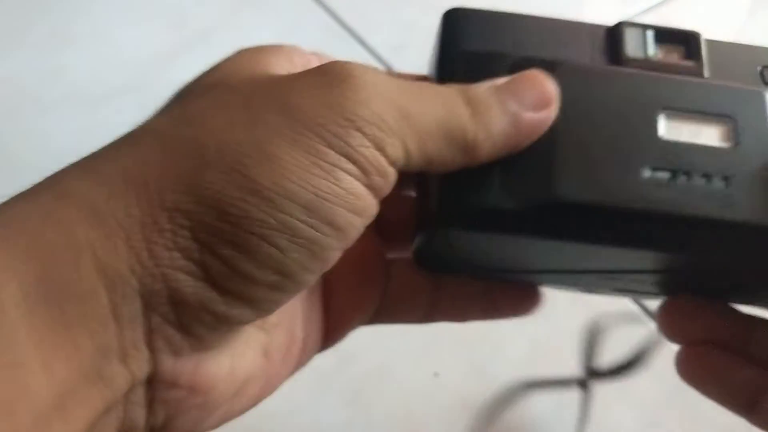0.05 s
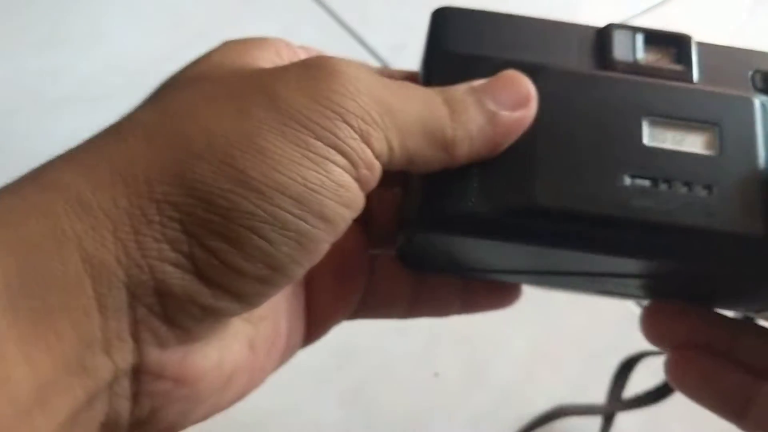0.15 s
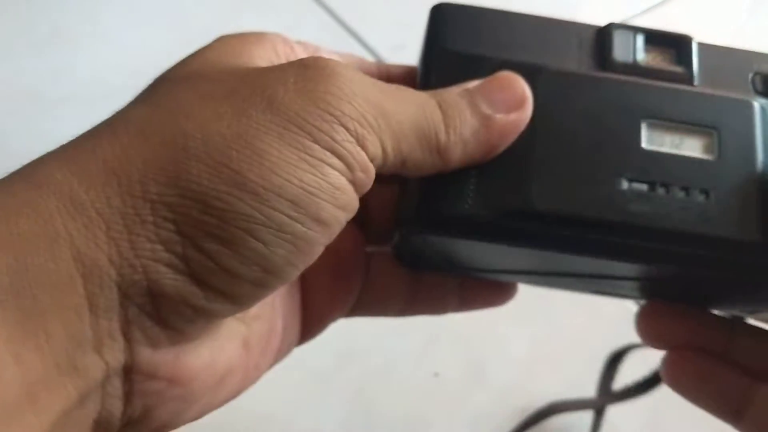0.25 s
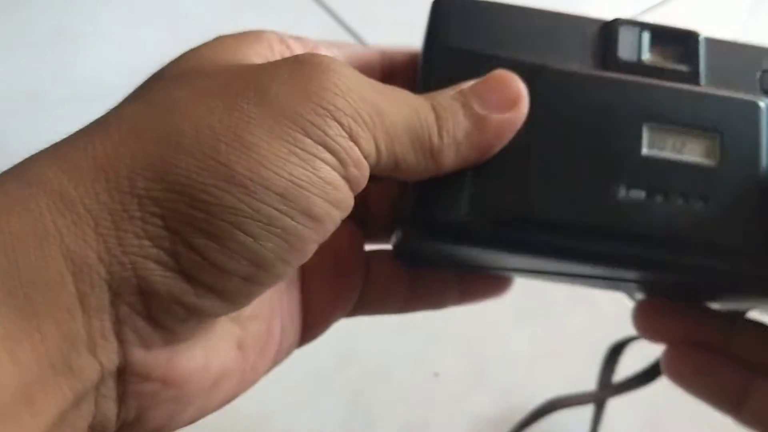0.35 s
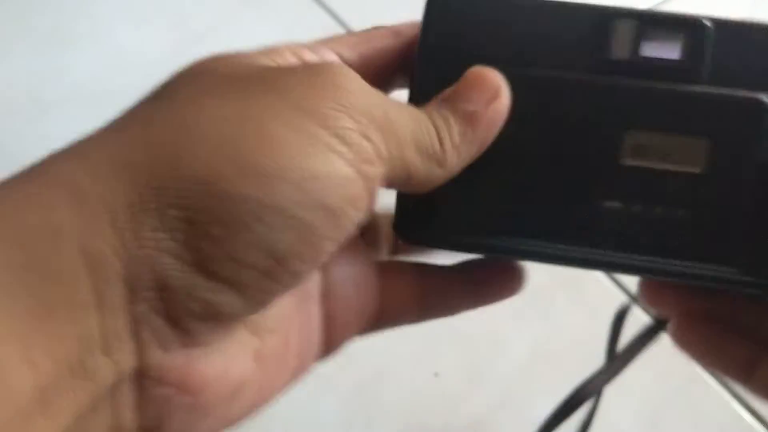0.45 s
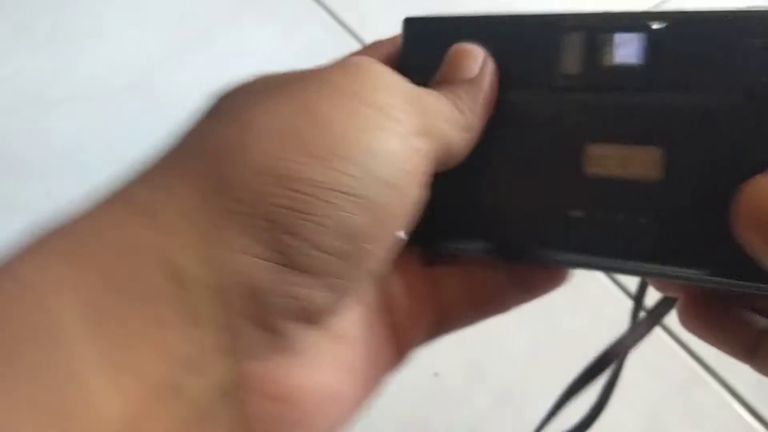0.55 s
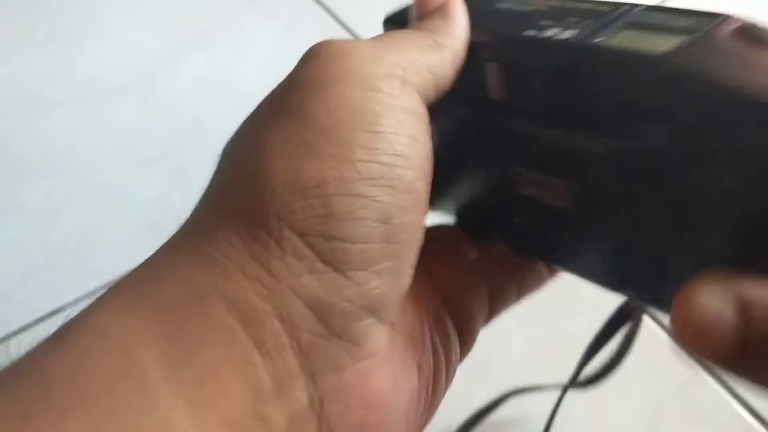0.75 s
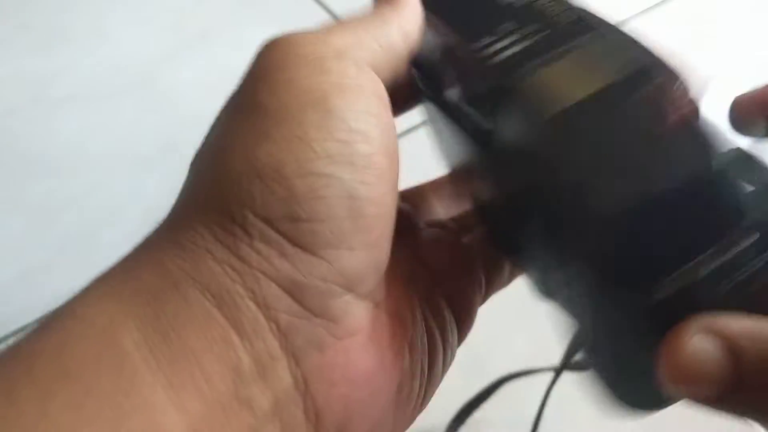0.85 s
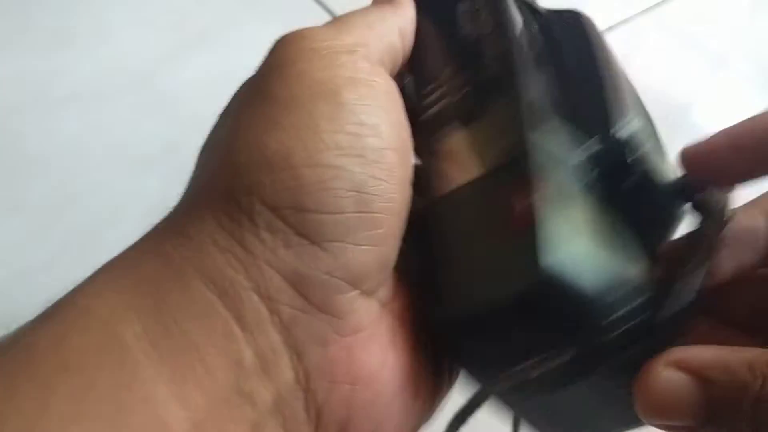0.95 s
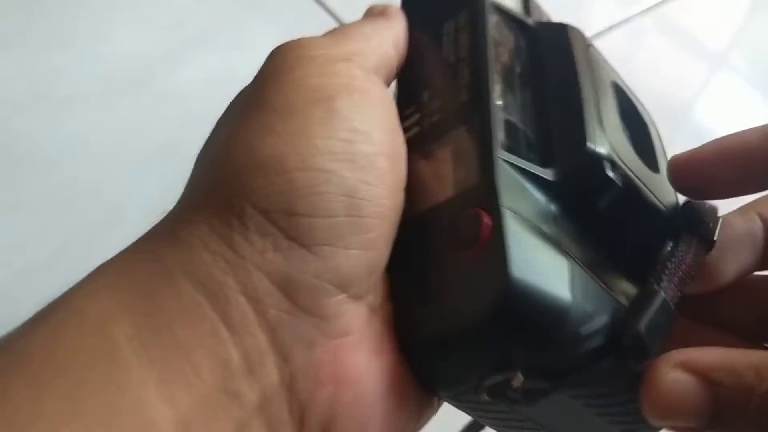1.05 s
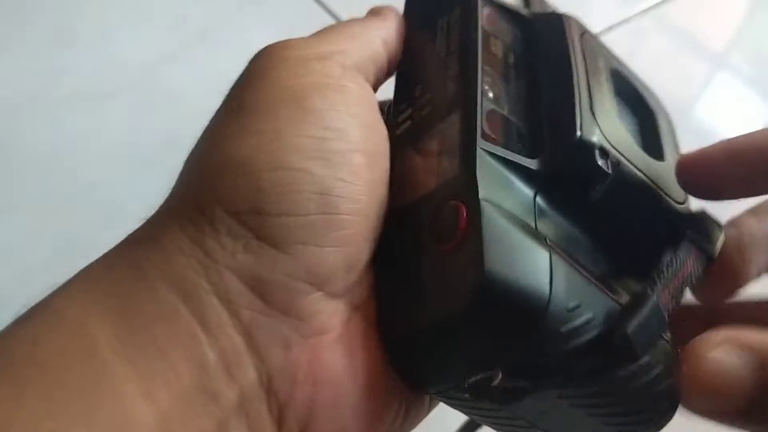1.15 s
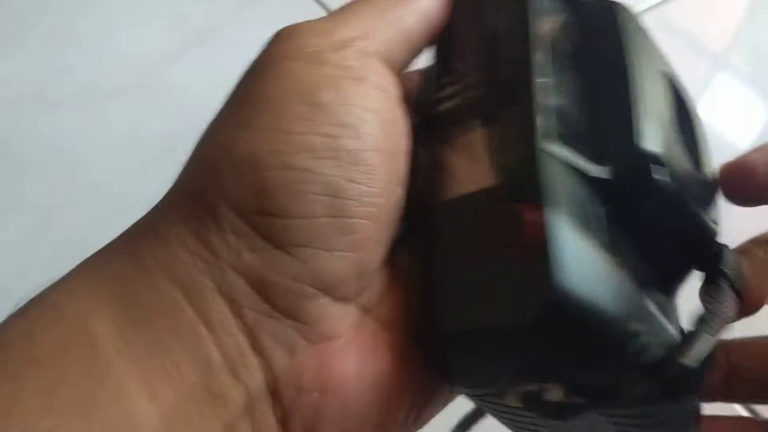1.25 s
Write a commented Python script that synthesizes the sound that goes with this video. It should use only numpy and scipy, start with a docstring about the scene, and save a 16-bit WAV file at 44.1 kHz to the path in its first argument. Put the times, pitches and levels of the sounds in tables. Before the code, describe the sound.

A compact film camera's shutter snaps once with a sharp plastic click. A moment later its small winding motor spins up and whirs steadily through its gears, close to the microphone in a quiet room.

```python
"""Compact film camera: shutter and winder

The camera is fired in the hand, close by, in a quiet tiled room with a low hum.
The shutter snaps in the plastic shell, its parts rebound and a spring rings on.
Then the winding motor spins up and whirs through its gears; its colour shifts
as the camera is tipped, and a pawl ticks once."""
import sys
import numpy as np
from scipy import signal
from scipy.fft import rfft, irfft, next_fast_len
from scipy.io import wavfile
from scipy.ndimage import map_coordinates

SR = 44100
rng = np.random.default_rng(int(sys.argv[2]) if len(sys.argv) > 2 else 0)


def wav_out(sig):
    """Save sig, one row per channel (or a flat mono array), as 16-bit PCM at SR to the path in sys.argv[1]."""
    wavfile.write(sys.argv[1], SR, np.round(np.clip(np.atleast_2d(sig).T, -1, 1) * 32767).astype(np.int16))


N = 57330
RELEASE_S, MOTOR_START_S = 0.239, 0.518
TIME_S = np.arange(N) / SR


def amp(db):
    """Decibels to gain."""
    return 10 ** (np.asarray(db) / 20)


def unit(x):
    """Scale to rms 1."""
    return x / np.sqrt(np.mean(x ** 2) + 1e-20)


def along(points, hz):
    """Interpolate (freq_hz, value) rows on a log axis."""
    freq_hz, values = np.transpose(points)
    return np.interp(np.log(hz + 1), np.log(freq_hz + 1), values)


def curves(rows):
    """Per-sample curve for each column after time_s."""
    time_s, *columns = np.transpose(rows)
    return [np.interp(TIME_S, time_s, column) for column in columns]


def wobble(rate_hz):
    """Smooth random curve, rate_hz knots a second."""
    knots = rng.standard_normal(int(N * rate_hz / SR) + 4)
    return map_coordinates(knots, [TIME_S * rate_hz])


def filtered(x, response):
    """Apply the gain response(hz)."""
    size = next_fast_len(N + SR // 2)
    return irfft(rfft(x, size) * response(np.fft.rfftfreq(size, 1 / SR)), size)[:N]


def noise(spectrum, tilt_db_per_oct=0):
    """Coloured noise of rms 1, tilted above 700 Hz."""
    def response(hz):
        return amp(along(spectrum, hz) + tilt_db_per_oct * np.log2(np.maximum(hz, 700)))
    return unit(filtered(rng.standard_normal(N), response))


def fade(t, t60_s):
    """Exponential decay."""
    return np.exp(-np.log(1000) * t / t60_s)


def background():
    """Wavering room hum and steady room noise."""
    # Hum tones: pitch_hz, level_db
    hum_tones = [(37.4, -58), (63, -60.5), (139, -71), (277, -73.5)]
    # Room noise: freq_hz, gain_db
    air_spectrum = [(20, -22), (40, -3.5), (66, 1), (100, -9.5), (170, -12), (270, -12), (380, -21),
                    (800, -19.5), (1500, -27.5), (4000, -36), (9500, -41), (11500, -48.5), (16000, -49)]
    hum = np.zeros(N)
    for hz, db in hum_tones:
        peak = np.sqrt(2) * amp(db + 1.9 * wobble(2))
        hum += peak * np.sin(2 * np.pi * (hz * TIME_S + rng.random()) + 0.33 * wobble(6.5))
    return hum + amp(-56) * noise(air_spectrum)


def grip():
    """The shifting grip rumbles softly."""
    # Grip shifts: centre_s, half_width_s, level_db
    shifts = [(0.059, 0.046, -47), (0.727, .025, -57), (0.822, 0.028, -52.5), (0.95, 0.057, -54.5)]
    # Rumble: freq_hz, gain_db
    rumble_spectrum = [(25, -12.5), (55, -4.5), (80, -12), (140, -18), (400, -49), (2000, -80)]
    swells = sum(amp(db) * np.exp(-((TIME_S - centre_s) / half_width_s) ** 2)
                 for centre_s, half_width_s, db in shifts)
    return swells * noise(rumble_spectrum)


def room_tail():
    """Walls and floor answer the snap with a diffuse tail; decay varies with frequency."""
    # Room decay: freq_hz, t60_s
    decay_times = [(200, 0.37), (1500, 0.84), (4000, 0.53), (9000, 0.53), (15000, .35)]
    # Tail colour: freq_hz, gain_db
    tail_spectrum = [(100, -20), (300, -16), (700, -7), (1100, -2), (1650, -2.5), (1950, -4.5), (2600, 0.5),
                     (2900, -3.5), (3400, 4.5), (4100, 7.5), (4500, 0), (6200, 0.5), (9400, 3),
                     (10500, -12), (15000, -18)]
    level_db, build_s = -41, 0.0088
    hz, frame_s, frames = signal.stft(noise(tail_spectrum), SR, nperseg=256)
    t = np.maximum(frame_s - RELEASE_S, 0)
    envelope = fade(t, along(decay_times, hz)[:, None]) * (1 - np.exp(-t / build_s))
    return amp(level_db) * signal.istft(frames * envelope, SR, nperseg=256)[1][:N]


def pawl():
    """A pawl slips in the film transport: one light tick."""
    # Tick: freq_hz, gain_db
    tick_spectrum = [(1500, -29), (2600, 1), (3100, -1), (4000, -9), (9000, -8), (12500, -24), (15500, -36)]
    start_s, level_db = 1.086, -42
    t = np.maximum(TIME_S - start_s, 0)
    return amp(level_db) * (t > 0) * fade(t, t60_s=0.034) * noise(tick_spectrum)


def gear_mesh():
    """Meshing teeth excite one narrow housing resonance that swells and sinks."""
    # Resonance swell: time_s, level_db
    swell = [(.53, -71.5), (.6, -60.5), (.72, -58), (.79, -72), (.85, -62), (.92, -58.5), (.97, -63.5),
             (1.3, -65)]
    centre_hz, width_hz = 4085, 230
    level_db, = curves(swell)
    band = filtered(rng.standard_normal(N), lambda hz: 1 / (1 + (2 * (hz - centre_hz) / width_hz) ** 2))
    return (TIME_S > MOTOR_START_S) * amp(level_db) * unit(band)


def housing(hz):
    """Gain of the gear housing's resonances."""
    # Resonances: centre_hz, width_hz, lift_db
    modes = [(4020, 83, -1), (5070, 82, 8), (5420, 120, 3), (6130, 220, 3.5), (7350, 250, 4),
             (8100, 280, 5.5), (9020, 330, 2)]
    return amp(sum(lift_db / (1 + (2 * (hz - centre_hz) / width_hz) ** 2)
                   for centre_hz, width_hz, lift_db in modes))


def gear_noise(shaft_rad, running_s):
    """Teeth rasp and churn, pulsing each turn; the churn is louder as the motor strains to start."""
    # Upper gear noise: freq_hz, gain_db
    rasp_spectrum = [(900, -55), (2300, -11), (2900, -8.5), (3500, -7), (4700, -6), (7000, -6.5),
                     (9200, -6), (11000, -23.5), (15500, -37)]
    # Lower gear noise: freq_hz, gain_db
    churn_spectrum = [(150, -33), (450, -15), (800, -1.5), (1020, -0.5), (1400, 2), (1800, 3.5), (2100, 2),
                      (2700, -4.5), (4000, -34)]
    rasp_db, churn_db, strain_db, strain_s = -3.5, -9, 10, 0.068
    pulse = np.cos(shaft_rad) + (np.cos(3 * shaft_rad) + np.cos(4 * shaft_rad)) / 2
    grain_db = 1.43 * wobble(900) + 0.77 * wobble(40.33)
    teeth = unit((1 + 0.083 * pulse) * amp(grain_db))
    rasp = amp(rasp_db) * unit(filtered(noise(rasp_spectrum), housing))
    churn = amp(churn_db + strain_db * np.exp(-running_s / strain_s)) * noise(churn_spectrum)
    return teeth * (rasp + churn)


def whine(shaft_rad):
    """Shaft harmonics and gear tones track the motor's speed."""
    # Shaft harmonics: order, gain_db
    harmonics = [(1, -17.5), (2, -17.5), (3, -11.5), (4, -18.5), (5, -6.5), (6, -0.5), (7, -7.5), (8, -12),
                 (9, -19), (10, -17.5), (11, -16), (12, -15), (13, -16.5), (14, -11), (15, -8.5)]
    # Slower wheels at full speed: pitch_hz, gain_db
    gear_tones = [(1025, -19.5), (1510, -17), (1778, -13.5), (2053, -13.5), (2345, -21), (3220, -19),
                  (3445, -25)]
    full_speed_hz, buzz_db, shimmer_db, play_rad = 278.6, -16.5, 2, 0.2
    wheels = [(hz / full_speed_hz, db) for hz, db in gear_tones]
    buzz = [(order, buzz_db) for order in range(16, 34)]
    tones = np.zeros(N)
    for order, db in [*harmonics, *wheels, *buzz]:
        peak = np.sqrt(2) * amp(db + shimmer_db * wobble(17.82))
        tones += peak * np.sin(order * shaft_rad + play_rad * wobble(110) + 2 * np.pi * rng.random())
    return amp(-0.5) * tones


def motor():
    """The winding motor spins up, driving whine and gear noise from one shaft."""
    # Shaft speed: time_s, speed_hz
    spin_up = [(.52, 90), (.56, 215), (.6, 259), (.65, 274), (.72, 276.4), (.8, 278.4), (.95, 279.6),
               (1.04, 278), (1.14, 277.5), (1.22, 278.8), (1.3, 279.4)]
    # Drive gains: time_s, whine_db, gears_db
    drive = [(.52, -72, -51), (.56, -62.5, -52), (.61, -69.5, -50.5), (.67, -55, -52), (.74, -55.5, -50),
             (.81, -54.5, -51.5), (.89, -53, -50), (.98, -53, -49.5), (1.08, -55, -49.5), (1.2, -53.5, -49),
             (1.3, -54, -49.5)]
    rise_s, flutter = 0.011, 0.0016
    speed_hz, = curves(spin_up)
    whine_db, gears_db = curves(drive)
    running_s = np.maximum(TIME_S - MOTOR_START_S, 0)
    shaft_rad = 2 * np.pi * np.cumsum(speed_hz * (1 + flutter * wobble(45.07))) / SR
    onset = np.minimum(running_s / rise_s, 1)
    return onset * (amp(whine_db) * whine(shaft_rad) + amp(gears_db) * gear_noise(shaft_rad, running_s))


def tipped(x):
    """Tipping the camera turns another side to the listener and recolours the sound."""
    # Colour after the turn: freq_hz, gain_db
    colour = [(800, 0), (1100, 4.5), (1400, -2), (1670, 0.5), (2600, -1), (3100, 5.5), (3550, 7), (3900, 3),
              (4200, -3.5), (4950, -3), (5400, 1), (6050, -2.5), (6450, 2.5), (7300, -6.5), (8500, -0.5)]
    centre_s, length_s = 0.99, 0.16
    blend = np.clip((TIME_S - centre_s) / length_s + 0.5, 0, 1)
    return (1 - blend) * x + blend * filtered(x, lambda hz: amp(along(colour, hz)))


def spring():
    """The released shutter spring rings on faintly."""
    # Spring modes: pitch_hz, level_db, t60_s
    modes = [(1269, -48.5, 0.7), (2536, -58, 0.96), (3618, -62, 0.37)]
    t = np.maximum(TIME_S - RELEASE_S, 0)
    return sum(amp(db) * fade(t, t60_s) * np.sin(2 * np.pi * hz * t) for hz, db, t60_s in modes)


def shutter():
    """Each contact cracks briefly and rings the damped modes of the plastic shell."""
    # Shutter contacts: start_s, level_db, tilt_db_per_oct
    contacts = [(.2133, -52, -1), (.2338, -32, -5), (.2386, -9.5, 1), (.2408, -33, 4), (.2446, -30.5, -5.5),
                (.2537, -32.5, -0.5), (.2565, -33, 4), (.2645, -51, 18)]
    # Shell modes: pitch_hz, width_hz, gain_db
    modes = [(263, 70, -17.5), (1090, 88, -2.5), (1720, 240, -3.5), (2435, 210, -5.5), (3170, 156, -5),
             (3490, 89, -7.5), (3992, 265, 2), (5680, 460, -5.5), (7240, 274, 3), (8150, 190, -6.5),
             (8770, 144, 0.5), (9450, 200, -3), (9720, 100, -7), (10370, 130, -12), (13400, 770, -19)]
    # Contact noise: freq_hz, gain_db
    crack_spectrum = [(100, -46), (780, -12), (1000, 6), (4000, 2), (9500, 1), (11000, -10.5), (15500, -20)]
    ring_db, crack_db, rise_s = 6.5, -7, 0.00043
    pitch_hz, width_hz, gain_db = np.transpose(modes)
    polarity = (-1) ** np.arange(len(modes))
    snaps = np.zeros(N)
    for start_s, level_db, tilt_db_per_oct in contacts:
        t = np.maximum(TIME_S - start_s, 0)
        scatter_db = rng.normal(0, 0.61, len(modes))
        gains = amp(gain_db + tilt_db_per_oct * np.log2(pitch_hz) + scatter_db) * width_hz * polarity
        gains /= np.linalg.norm(gains)
        ring = sum(gain * np.exp(-np.pi * width * t) * np.sin(2 * np.pi * hz * t)
                   for hz, width, gain in zip(pitch_hz, width_hz, gains))
        crack = noise(crack_spectrum, tilt_db_per_oct) * fade(t, t60_s=0.016)
        attack = 1 - np.exp(-t / rise_s)
        snaps += amp(level_db) * attack * (amp(ring_db) * ring + amp(crack_db) * crack)
    return snaps


def scene():
    """Room, winder and shutter, alike in both channels."""
    ambience = background() + grip() + room_tail()
    winder = pawl() + gear_mesh() + tipped(motor())
    mono = ambience + winder + spring() + shutter()
    return np.array([mono, mono])


def record(dry):
    """Steep band limit on deep bass and top treble."""
    low_hz, top_hz = 30, 15800

    def band(hz):
        return (1 - np.exp(-(hz / low_hz) ** 8)) / np.sqrt(1 + (hz / top_hz) ** 160)
    return np.array([filtered(channel, band) for channel in dry])


dry = scene()
out = record(dry)
wav_out(out)
```